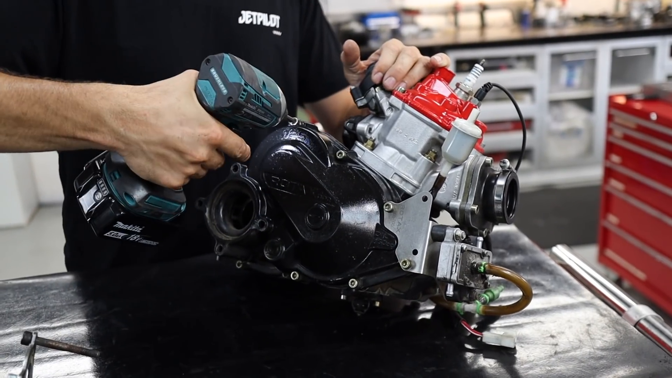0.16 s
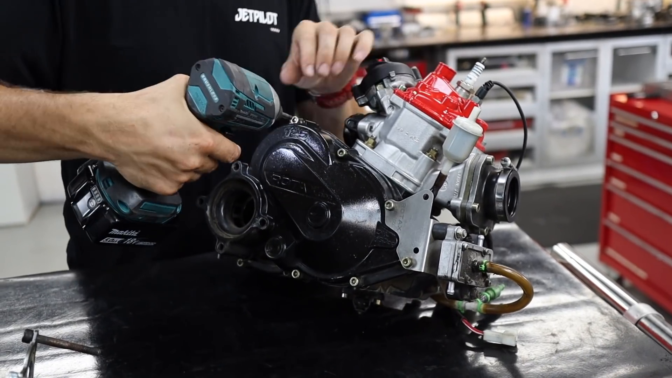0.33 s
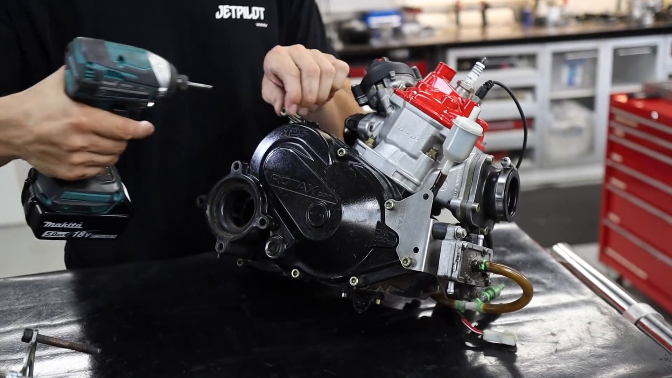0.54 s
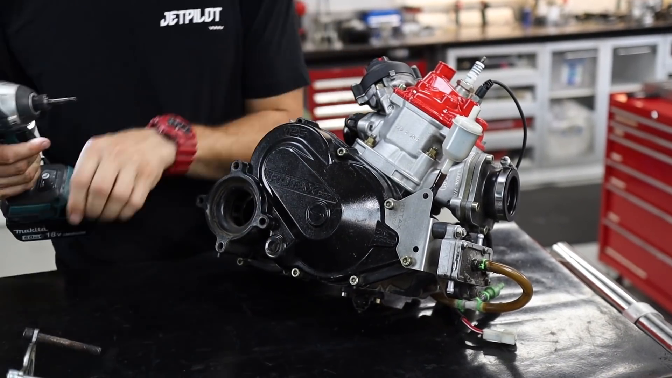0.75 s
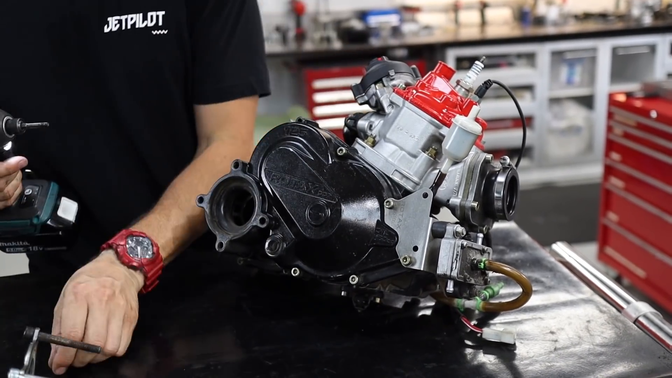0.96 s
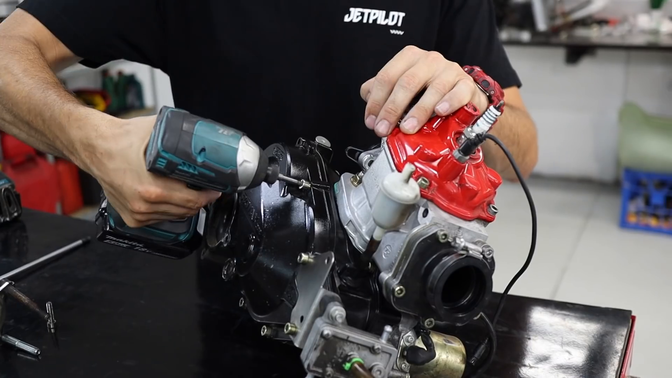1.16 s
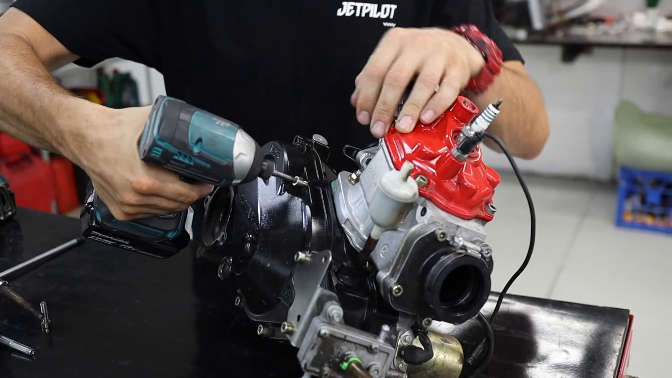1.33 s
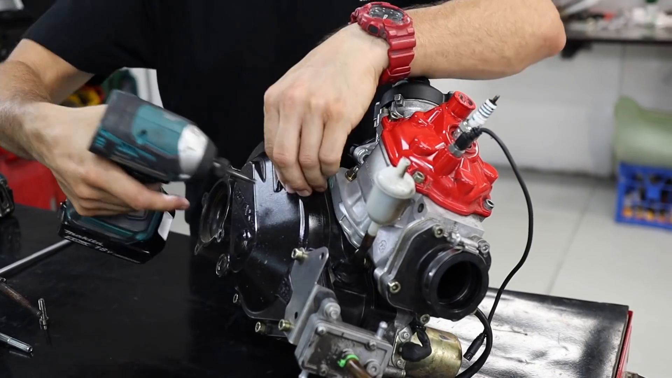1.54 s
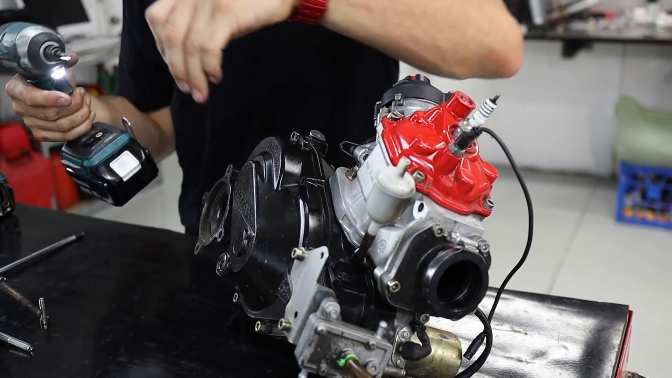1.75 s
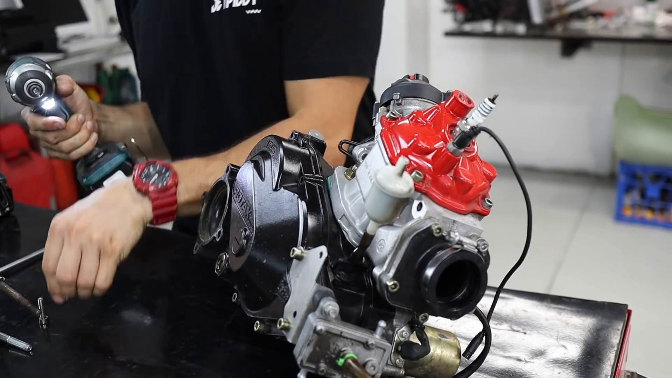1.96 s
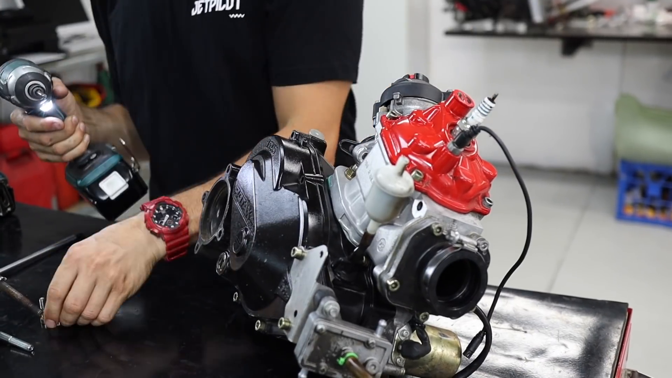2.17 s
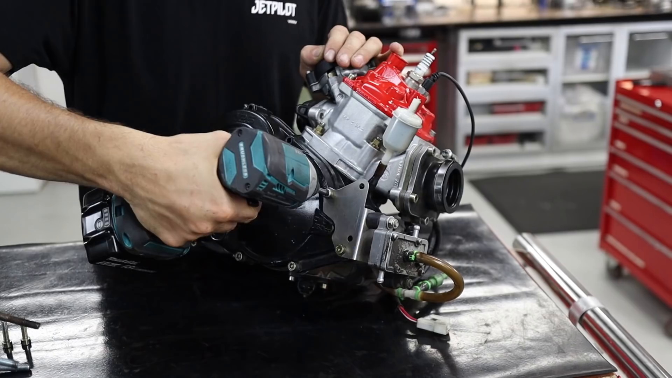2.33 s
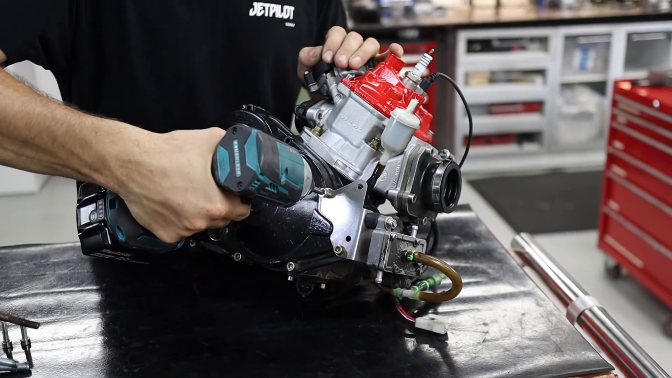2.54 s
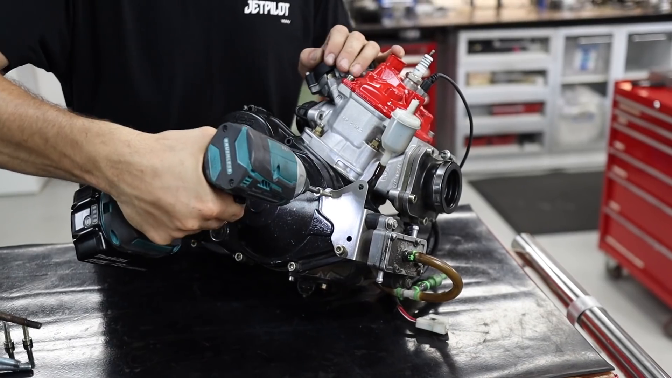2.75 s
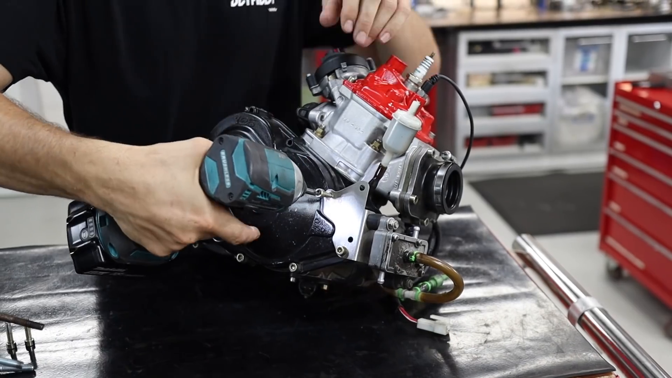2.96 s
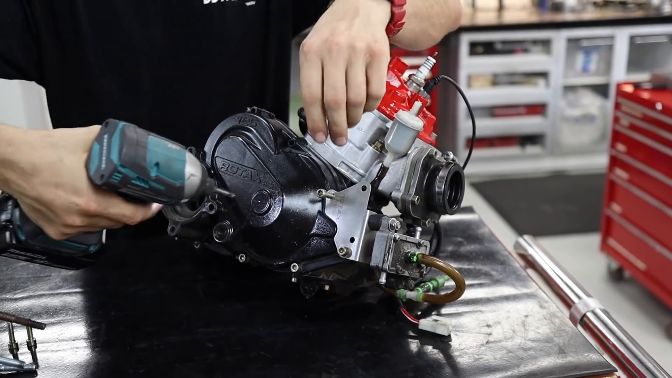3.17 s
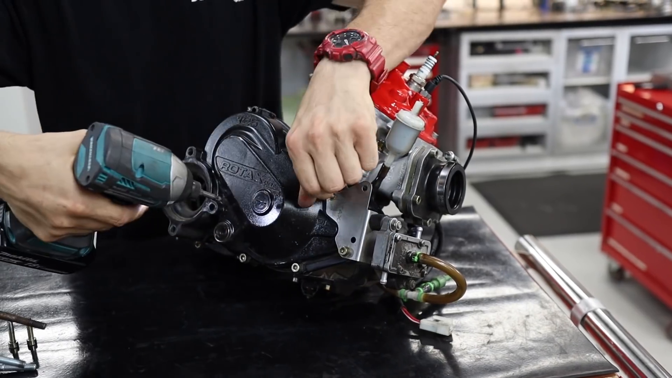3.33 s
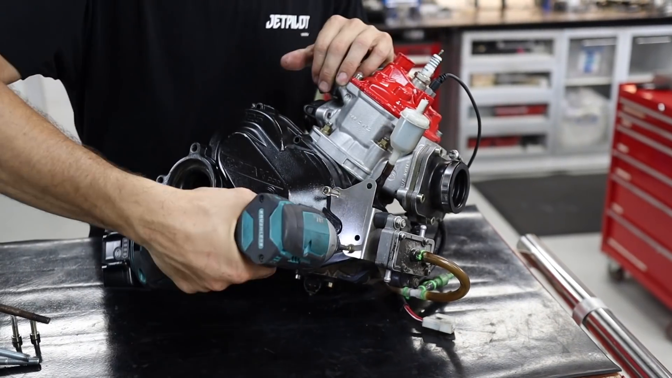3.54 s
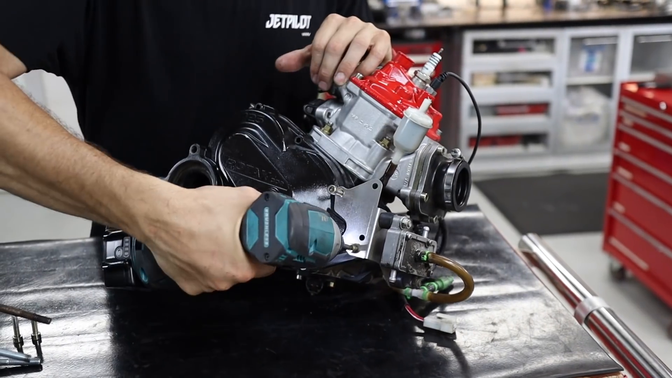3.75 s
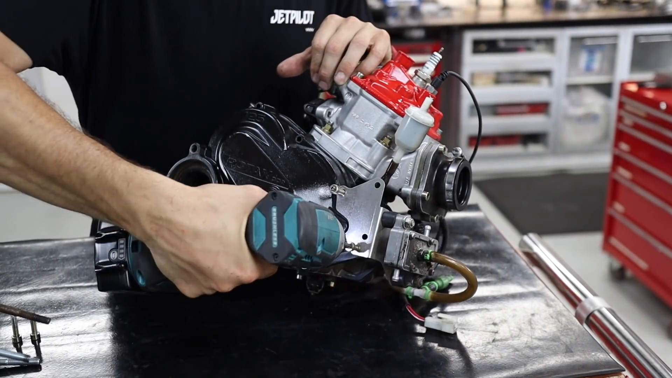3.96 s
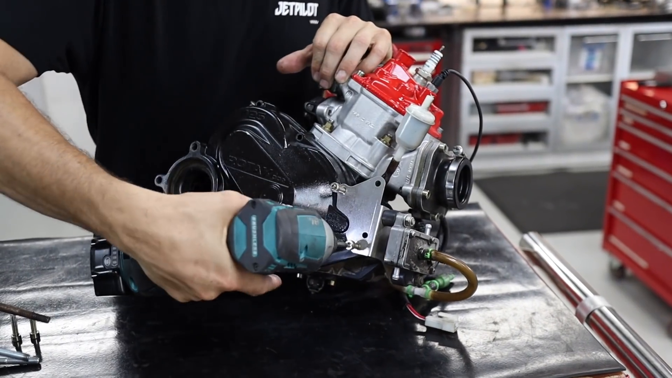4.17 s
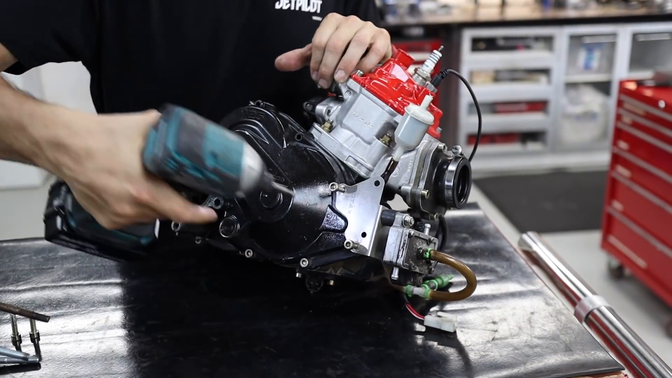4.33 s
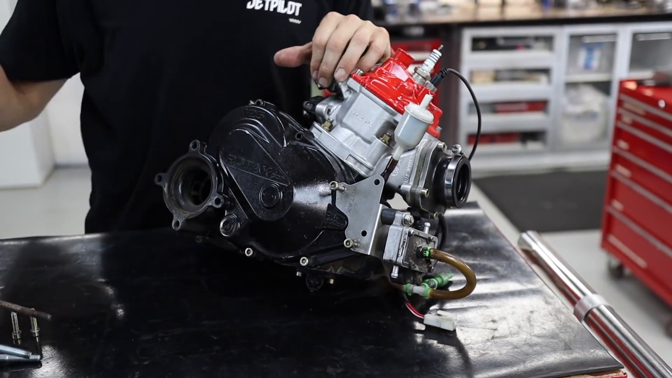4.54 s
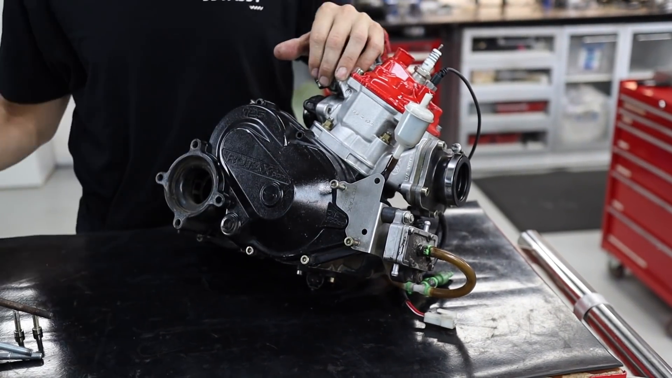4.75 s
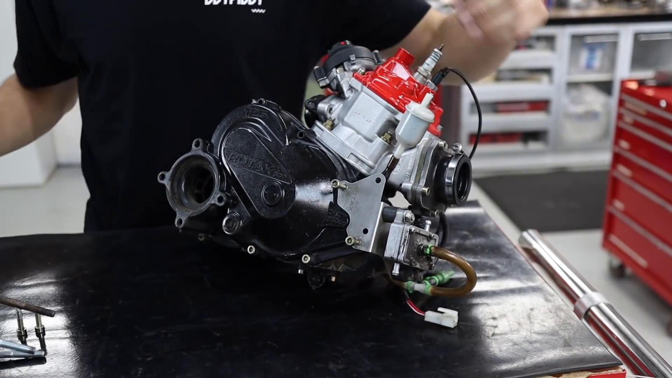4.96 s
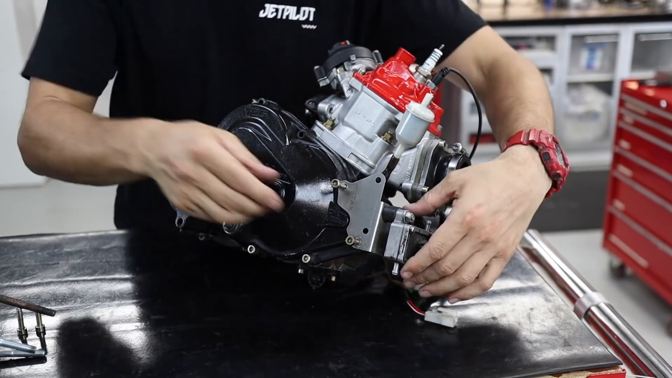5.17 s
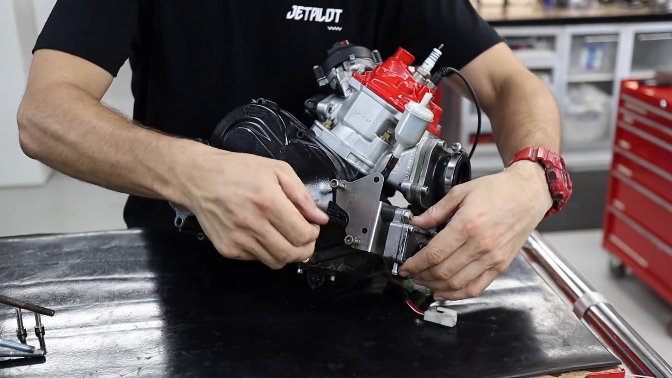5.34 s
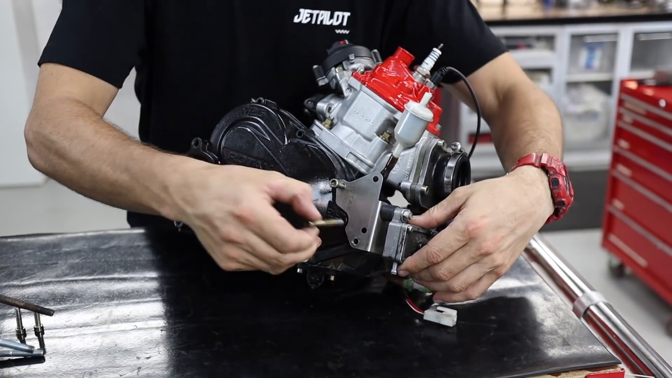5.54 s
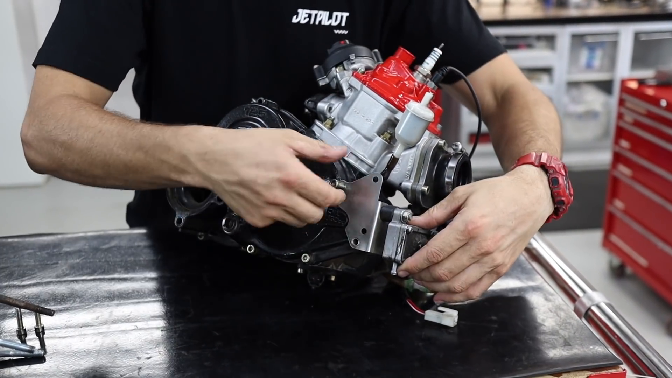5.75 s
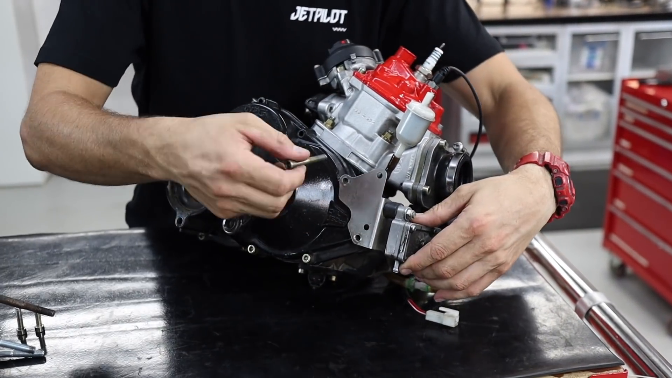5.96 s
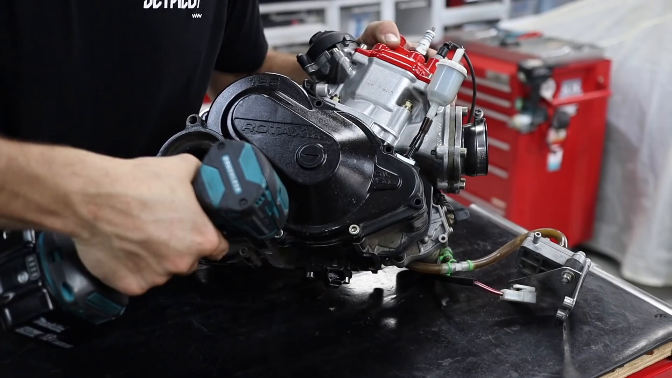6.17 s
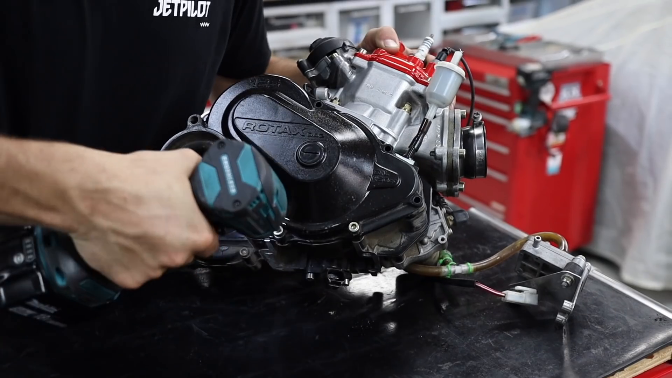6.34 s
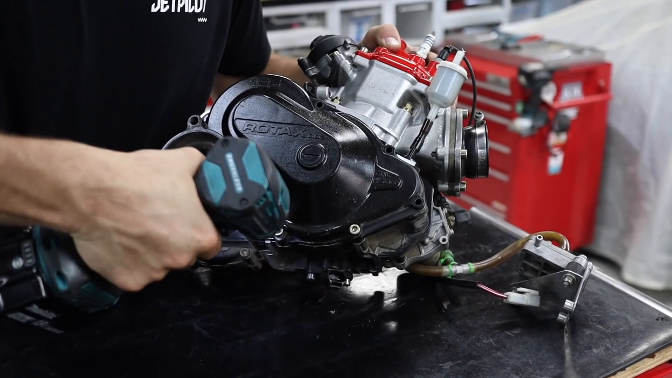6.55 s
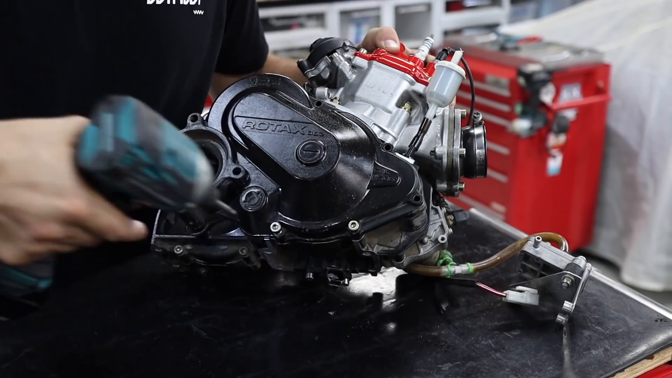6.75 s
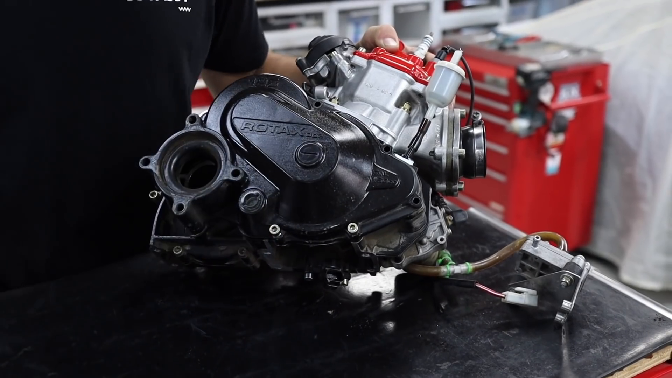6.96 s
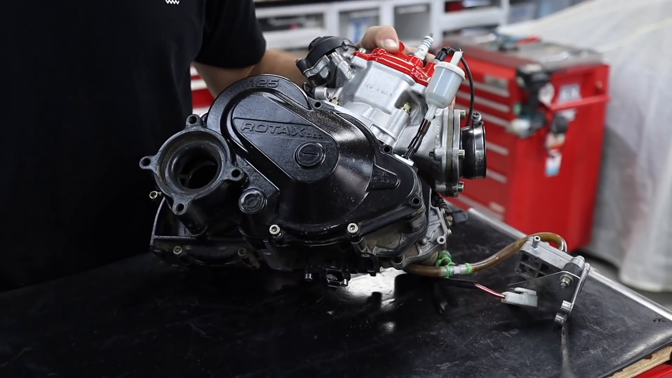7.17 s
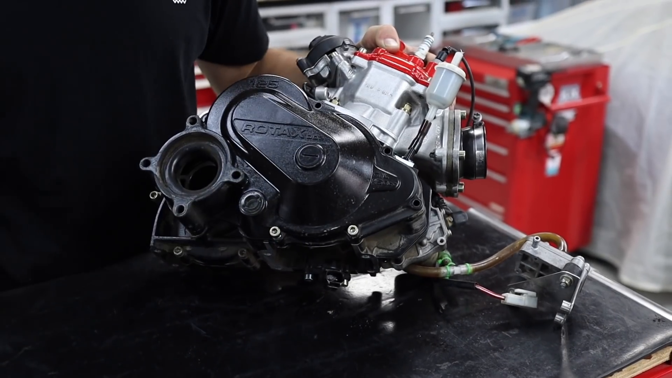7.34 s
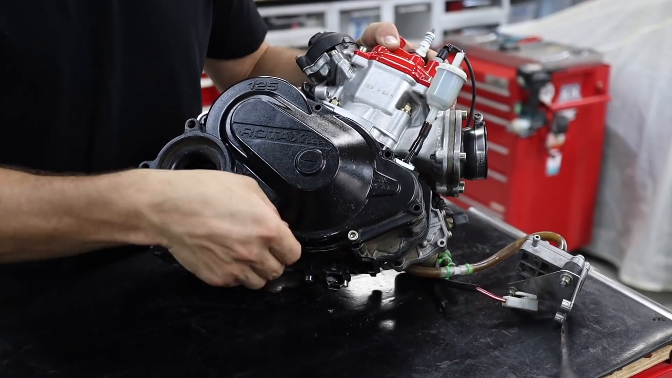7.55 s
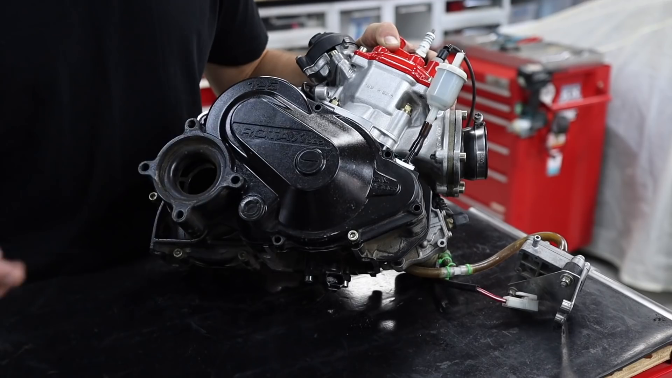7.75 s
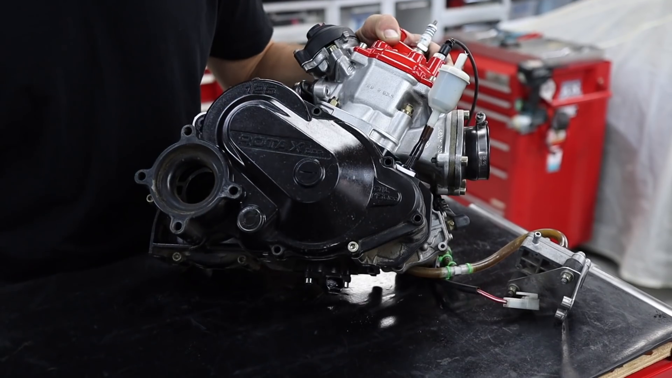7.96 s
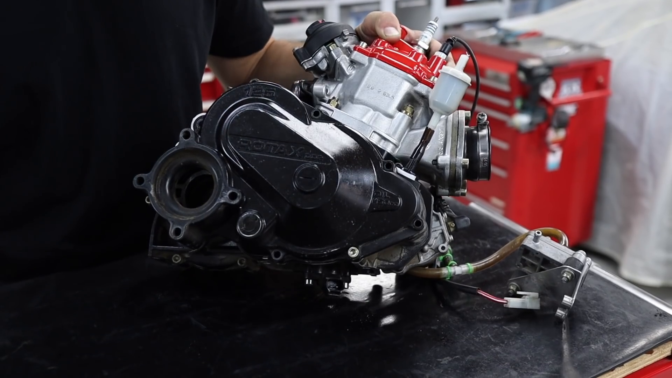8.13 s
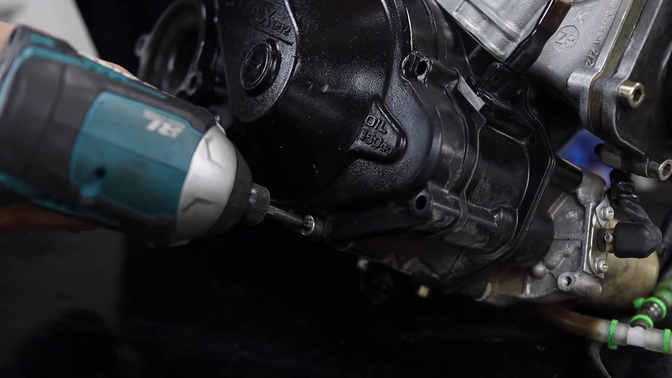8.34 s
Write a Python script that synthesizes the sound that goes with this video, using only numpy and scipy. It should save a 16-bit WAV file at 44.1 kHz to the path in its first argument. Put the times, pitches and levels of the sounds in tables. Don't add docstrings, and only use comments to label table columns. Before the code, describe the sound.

A cordless impact driver backs out screws in four short whining, rattling bursts opened by sharp hammer knocks, with ticks, bench thuds and a ringing thin plate between.

```python
import sys
import numpy as np
from scipy import signal
from scipy.fft import rfft, irfft
from scipy.io import wavfile

SR = 44100
rng = np.random.default_rng(int(sys.argv[2]) if len(sys.argv) > 2 else 0)


def volts_from_db(level):
    exponent = np.asarray(level, float) / 20
    return 10 ** exponent


def bounce(signal):
    frames = np.transpose(np.atleast_2d(signal))
    limited = np.clip(frames, -1, 1)
    pcm = np.round(limited * 32767).astype(np.int16)
    wavfile.write(sys.argv[1], SR, pcm)


N = 374850

BLUR_HZ = (150, 45, 170)
STEADY = (0, 1.7, .2)
# (frequency [Hz], level [dB], T60 [s])
DULL = [(1450, 0, .012), (2100, 0, .012), (4900, -2, .008)]


def rms_one(x):
    return x / np.sqrt(np.mean(np.abs(x) ** 2) + 1e-20)


def band(x, low_hz, high_hz, order=2):
    edges = [low_hz, min(high_hz, .45 * SR)]
    return signal.sosfilt(signal.butter(order, edges, "band", fs=SR, output="sos"), x)


def on_log(points, hz):
    table_hz, values = np.transpose(points)
    return np.interp(np.log(hz), np.log(table_hz), values)


def coloured(x, spectrum):
    hz = np.maximum(np.arange(len(x) // 2 + 1) * SR / len(x), 1)
    return rms_one(irfft(rfft(x) * volts_from_db(on_log(spectrum, hz)), len(x)))


def drift(count, rate_hz):
    r = np.exp(-2 * np.pi * rate_hz / SR)
    noise = rng.standard_normal(count + 8000)
    return rms_one(signal.lfilter([1], [1, -2 * r, r * r], noise)[8000:])


def blurred(phase, blur_hz, steady=0):
    in_phase = (steady + drift(len(phase), blur_hz)) * np.cos(phase)
    quadrature = drift(len(phase), blur_hz) * np.sin(phase)
    return (in_phase + quadrature) / np.sqrt(1 + steady ** 2 / 2)


def ring(x, hz, t60):
    r, w = volts_from_db(-60 / (t60 * SR)), 2 * np.pi * hz / SR
    return signal.lfilter([0, np.sin(w)], [1, -2 * r * np.cos(w), r * r], x + 1e-18)


def glide(start, end, from_hz, to_hz, fade_s):
    t = np.arange(round(start * SR), min(round(end * SR), N)) / SR
    already_on = start == 0
    edge = np.clip(np.minimum(t - start + already_on, end - t) / fade_s, 0, 1)
    return round(start * SR), np.interp(t, [start, end], [from_hz, to_hz]), edge


def contacts(hits, modes, middle_db, ring_db, low_hz, top_hz, swell):
    shape = np.zeros((3, N))
    t = np.arange(int(.3 * SR)) / SR
    for s, db, hard_db, dies_ms in hits:
        dies = max(dies_ms, 3) / 1000
        rise = 0.000075 + swell * dies
        fall = volts_from_db(-60 * np.maximum(t - rise, 0) / dies) * np.minimum(t / rise, 1) ** 2
        part = shape[:, round((s - .6 * rise) * SR):][:, :len(t)]
        range_db = [[db - hard_db], [db + middle_db], [db + hard_db]]
        part[:] = np.hypot(part, volts_from_db(range_db) * fall[:part.shape[1]])
    sounding = np.flatnonzero(shape[0])
    used = slice(sounding[0], sounding[-1] + SR // 10)
    white = (rng.standard_normal((3, N)) * shape)[:, used]
    edges = [(low_hz, 2500), (2500, 7000), (7000, top_hz)]
    crack = sum(band(w, a, b) * np.sqrt(SR / 2 / (b - a)) for w, (a, b) in zip(white, edges))
    rings = sum(volts_from_db(db) * ring(crack, hz, t60) for hz, db, t60 in modes)
    out = np.zeros((2, N))
    out[:, used] = crack, volts_from_db(ring_db) * rings
    return out


def gear_rattle(impacts, shift, shade):
    # (frequency [Hz], density [dB per Hz])
    gear_colour = [(59, -21), (100, 3.5), (185, -9), (320, -51), (590, -9.5), (1700, 3.5), (2760, 0.5),
                   (3340, 8.5), (3790, 3), (5100, 8.5), (6170, 1), (10500, -13), (13800, -15),
                   (15600, -20.5)]
    # (frequency [Hz], width [Hz], level [dB])
    housing = [(680, 110, -6.5), (1150, 200, -13), (4600, 310, -5.5), (5940, 920, 2), (6800, 500, -10),
               (8040, 670, -7), (9200, 350, -13.5)]
    shade_hz = [450, 900, 2400, 3800, 5000, 6300, 7800, 9500, 13000]
    rattle = coloured(impacts, [(hz * shift, db) for hz, db in gear_colour])
    body = sum(volts_from_db(db) * rms_one(ring(impacts, hz, 1.1 / width)) for hz, width, db in housing)
    return coloured(rattle + volts_from_db(-19.5) * body, list(zip(shade_hz, shade)))


def rotor_whistle(t, whistle_db, clear_at, whistle_hz):
    from_clear = t - clear_at
    level_db = whistle_db - np.minimum(3 * (from_clear / .035) ** 2, 30) + 2 * drift(len(t), 8)
    hz = whistle_hz + 5500 * from_clear
    return volts_from_db(level_db) * blurred(2 * np.pi * np.cumsum(hz) / SR, BLUR_HZ[1], STEADY[1])


def motor():
    # (start [s], brake done [s], level [dB], rise [s], gear mesh at start [Hz])
    bursts = [
        (-.3, 0.054, -14, 0.038, 1560),
        (1.216, 1.462, -14.5, 0.039, 1606),
        (2.534, 2.942, -15.5, 0.041, 1601),
        (3.777, 4.151, -14.5, 0.023, 1577),
        (6.395, 6.686, -14.5, 0.058, 1561),
    ]
    # (first, second, third mesh tone [dB], gain as the load falls away [dB])
    facing = [(-28, -16, -15.5, 6), (-17.5, -21, -41, 4), (-28, -13, -5, 2), (-31.5, -19, -17.5, 20),
              (-15, -20, -11, 9)]
    # (level [dB], clearest at [s], frequency then [Hz])
    whistles = [(-30, 0, 12700), (-18, 1.31, 12450), (-23, 2.72, 12550), (-23, 3.88, 11900),
                (-17, 6.6, 12330)]
    # (low rattle [dB], hiss [dB], mesh climb [Hz], pitch shift of the rattle spectrum [ratio])
    load = [(0, -1, 251.6, .98), (0, 0.36, 231, .99), (0, 0.011, 227.7, 1.054), (0, 1.5, 258.9, 1.03),
            (0, 0.28, 221.9, 1.05)]
    fifths = [-32, -21.5, -15.5, -24.5, -19]
    shades = [
        [2.5, 0, -2, -1.5, -1, -1.5, 2, 0, 0],
        [1.5, 0, 2, -4, 0, -2.5, 1, -1.5, 0.17],
        [-1.5, 0, 0.36, 2, 0.054, 2.5, 3, -0.5, 0.053],
        [-3.5, 0.93, 0, -1, 1, 0, 1, 0, 1],
        [0, 0, 0, -3.5, 0, -2.5, 3, -6, -1],
    ]
    carrier = [(2, 0.044), (3, 0.026), (6, 0.026)]
    out = np.zeros((2, N))
    for burst, face, whistle, (low_db, hiss_db, climb_hz, shift), fifth_db, shade in zip(
            bursts, facing, whistles, load, fifths, shades):
        start, stop, level_db, rise, start_hz = burst
        *tones_db, growth_db = face
        at = max(round(start * SR), 0)
        t = np.arange(at, round(stop * SR)) / SR
        n = len(t)
        edge = np.clip(np.minimum(t - start, stop - t) / 0.003, 0, 1)
        freed = 1 - np.exp((start - t) / .4)
        braking = np.clip(1 - (stop - t) / 0.0216, 0, 1)
        swing_db = -16.5 * np.clip(1 - (t - start) / rise, 0, 1) - 6 * braking
        mesh_hz = start_hz + climb_hz * freed - 120 * braking
        phase = 2 * np.pi * np.cumsum(mesh_hz) / SR

        impacts = volts_from_db(2.2 * np.minimum(rng.exponential(1, n), 4)) * rng.standard_normal(n)
        rattle = gear_rattle(impacts, shift, shade)
        lumps_db = 1.2 * drift(n, 60)
        low = volts_from_db(-11.5 + low_db + lumps_db + 0.37 * swing_db) * rms_one(band(rattle, 84.0, 2730))
        hiss = volts_from_db(-14 + hiss_db + swing_db) * rms_one(band(rattle, 9500, 17000, order=3))
        gears = volts_from_db(-2.5) * rms_one(band(rattle, 2500, 9500, order=3))
        gears += volts_from_db(fifth_db) * rms_one(band(impacts, 20, 348)) * np.cos(5 * phase)

        seating_db = -7 * np.exp((start + rise - t) / .07).clip(0, 1)
        unmesh_db = -14 * np.clip(1 - (stop - t) / .035, 0, 1)
        lines = sum(volts_from_db(tones_db[k]) * blurred((k + 1) * phase, BLUR_HZ[k], STEADY[k])
                    for k in range(3))
        mesh = volts_from_db(growth_db * freed + seating_db + unmesh_db) * lines
        carrier_phase = phase / 98.0
        throb = 1 + sum(d * np.cos(k * carrier_phase + rng.uniform(0, 18.0)) for k, d in carrier)
        out[0, at:at + n] += edge * volts_from_db(level_db) * throb * (volts_from_db(swing_db) * gears + low + hiss)
        tonal = throb * mesh + rotor_whistle(t, *whistle)
        out[1, at:at + n] += edge * volts_from_db(level_db + swing_db) * tonal
    return out


def background():
    # (frequency [Hz], density [dB per Hz])
    air_colour = [(13, -31.5), (22, -15), (70, -6.5), (168, 1), (209, -5.5), (373, -8.5), (439, -11),
                  (518, -10), (628, -13), (804, -11), (2480, -25), (3010, -28), (5500, -36.5), (15600, -41)]
    # (start [s], end [s], level over the rumble [dB])
    leaning = [(0, 0.116, 12.5), (2.552, 2.685, 8.5), (3.533, 3.9, 8), (4.908, 5.005, 8.5),
               (5.995, 6.3, 2.5)]
    # (start [s], end [s], from [Hz], to [Hz], level [dB])
    hum = [(0.059, 1.107, 65.2, 67.7, -41.5), (3.998, 4.476, 64.4, 68.8, -48), (0, 0.283, 141, 142, -44),
           (1.7, 2.428, 176.3, 168.2, -48.5), (2.75, 2.936, 190, 162, -41), (4.401, 4.9, 101, 99.8, -49),
           (6.498, 6.85, 104.4, 99.4, -46.5),
           (3.5, 3.98, 92, 78, -45), (3.5, 3.8, 160, 125, -47), (5.2, 5.6, 140, 155, -52)]
    # (start [s], end [s], frequency [Hz], width [Hz], level [dB])
    far_whine = (6.75, 8.0, 3050, 110, -69)
    air = coloured(rng.standard_normal(N), air_colour)
    upper = air - band(air, 80, 280)
    out = upper / np.std(band(air, 200, 2400)) * volts_from_db(-45 + 1.1 * drift(N, 1.3))
    t = np.arange(N) / SR
    leaning_db = sum(db * np.clip(np.minimum(t - start, end - t) / 0.0045, 0, 1)
                     for start, end, db in leaning)
    out += rms_one(air - upper) * volts_from_db(-49.5 + leaning_db + 1.1 * drift(N, 1.5))
    for start, end, from_hz, to_hz, db in hum:
        at, hz, edge = glide(start, end, from_hz, to_hz, 0.066)
        level = np.sqrt(2) * edge * volts_from_db(db + 2.0 * drift(len(hz), 16))
        out[at:at + len(hz)] += level * np.sin(2 * np.pi * np.cumsum(hz) / SR)
    start, end, whine_hz, width, db = far_whine
    at, hz, edge = glide(start, end, whine_hz, whine_hz, 0.052)
    out[at:at + len(hz)] += edge * volts_from_db(db) * blurred(2 * np.pi * np.cumsum(hz) / SR, width)
    return out


def handling():
    # (time [s], level [dB], hardness as treble lift [dB], decay [ms])
    ticks = [(.5794, -37.5, 1.5, 16), (.5959, -49, 10, 10), (.618, -41.5, 5.5, 9), (.6194, -43.5, 13, 26),
             (2.4343, -47.5, 2, 32), (3.1338, -50, -1, 14), (3.136, -55, -14, 170), (3.1447, -58, -11, 20),
             (3.5453, -52, -2, 20), (3.6717, -45.5, -4.5, 12), (3.6899, -54, 4.5, 40),
             (3.6993, -48, -7.5, 47), (4.598, -48, 0, 10), (4.9489, -37.5, -3, 5.1),
             (6.3263, -50.5, 1, 170), (7.1258, -52, 9, 8.8), (7.5077, -45.5, 2, 14),
             (7.5764, -24.5, 3.5, 6.2),
             (.305, -63.5, 3, 240), (.599, -45.5, 11, 106), (1.115, -50.5, -4, 190),
                   (4.66, -59, 3, 28), (4.958, -50, -7, 7.9), (4.974, -48, -5, 14), (4.99, -51, -5, 23),
                   (5.333, -68, 3, 34), (6.961, -50, -2, 12), (7.56, -58, -14.5, 170)]
    knocks = [
        (.9445, -50.5, -27, 21.9),
        (.952, -61, -19, 192.3),
        (3.535, -55.5, -10.5, 150),
        (8.1222, -36, -12, 22.8),
    ]
    bit_wobble = [(1.318, -31.5, -0.5, 139), (1.36, -34.5, -5, 185)]
    tray_hits = [(1.7065, -51, 2.5, 14), (1.7109, -40.5, 15, 11)]
    tray_buzz = [(1.714, -49.5, 1, 254), (7.68, -57.5, -7, 281)]
    bit_chatter = [(4.036, -32.5, 0.42, 60), (4.096, -33, -0.78, 40)]
    screw_hits = [(7.621, -60, -3, 52), (7.6328, -28, 10.5, 4.6), (7.635, -43.5, 4, 39),
                  (7.6515, -30.5, 7, 20.5), (7.662, -20, 8.5, 3.9), (7.664, -30, 4.5, 37),
                  (7.671, -34, 3.5, 16.8), (7.674, -39, -7.5, 20.5)]
    # (frequency [Hz], level [dB], T60 [s])
    screw_tray = [(2460, 8, 0.1), (3160, 4, .06), (4300, 0, .007), (9000, 10.5, 0.012)]
    tray_floor = [(4060, -3, .02), (4270, -3, .018), (4600, -5, .006)]
    screws = [(1980, -4, 0.02), (3940, -10, 0.011), (5100, -5, 0.0046), (6460, -6, 0.003),
              (8920, -7, 0.0079)]
    wobble_modes = [(240, -3, .025), (450, -2, .015), (660, -4, .018), (1200, 1, .012)]
    casing = [(795, -0.5, 0.0092), (1487, -1.5, 0.005), (2390, -4, 0.0027)]
    out = contacts(ticks, DULL, middle_db=4.5, ring_db=-36.0,
                   low_hz=927, top_hz=12300, swell=0.023)
    out += contacts(knocks + bit_chatter, casing, middle_db=0.0, ring_db=-19.5,
                    low_hz=624, top_hz=10930, swell=0.014)
    out += contacts(bit_wobble, wobble_modes, middle_db=9.5, ring_db=-21.5,
                    low_hz=166.0, top_hz=14000, swell=0.055)
    out += contacts(tray_hits, screw_tray, middle_db=22.0, ring_db=-36.0,
                    low_hz=1460, top_hz=12870, swell=0.029)
    out += contacts(tray_buzz, tray_floor, middle_db=6.0, ring_db=-11.5,
                    low_hz=1500, top_hz=11000, swell=0.029)
    return out + contacts(screw_hits, screws, middle_db=9.5, ring_db=-12.0,
                          low_hz=1300, top_hz=14200, swell=0.01)


def bench():
    # (time [s], level [dB])
    thuds = [
        (0.947, -36),
        (3.543, -31.5),
        (4.818, -19.5),
        (4.825, -16),
        (4.847, -25),
        (7.161, -24),
        (7.18, -33),
        (7.242, -36),
        (7.278, -37),
        (8.12, -41),
    ]
    # (frequency [Hz], level [dB], T60 [s])
    bench_modes = [(74.3, -9, 0.15), (109, -2, 0.14), (150.3, 4.5, 0.055), (225, -2.5, 0.098),
                   (294, -5.5, 0.024)]
    times, levels_db = np.transpose(thuds)
    out = np.zeros(N)
    for hz, mode_db, t60 in bench_modes:
        push = np.zeros(N)
        push[[round(s * SR) for s in times]] = volts_from_db(levels_db + mode_db + rng.normal(0, 5.6, len(thuds)))
        out += ring(push, hz, t60)
    return band(out, 62, 500)


def controller_whine():
    # (time [s], level [dB])
    chirps = [(1.148, -32), (2.462, -43), (3.712, -45.5), (6.35, -54)]
    length = .018
    t = np.arange(round(length * SR)) / SR
    out = np.zeros(N)
    for s, db in chirps:
        tone = np.sin(2 * np.pi * 8000 * t) * np.sin(np.pi * t / length) ** .5
        out[round(s * SR):][:len(t)] += volts_from_db(db) * tone
    return out


def hammer():
    # (time [s], level [dB], hardness as treble lift [dB], decay [ms])
    knocks = [
        [(1.1567, -22.5, -0.5, 180), (1.1648, -12.5, -0.5, 4.3), (1.1662, -9, -2, 4.3), (1.1681, -10, 2.5, 4.4),
         (1.1725, -16, 5, 6.3), (1.18, -16, 7, 7), (1.1849, -14, 4.5, 9), (1.2, -20.5, 6.5, 20),
         (1.2062, -24.5, 3.5, 13)],
        [(2.475, -26.5, -5, 82), (2.483, -16.5, -6, 14.5), (2.488, -19.5, -4, 12), (2.4909, -8, 11.5, 9),
         (2.494, -21, 2.5, 40), (2.504, -32, -2, 97), (2.5183, -24.5, 4, 20.64), (2.5247, -20, 6, 36),
         (2.5517, -22.5, 1.5, 8)],
        [(3.727, -30, -1, 157), (3.7327, -15.5, -3.5, 11.8), (3.7365, -15, 0.5, 7.5), (3.7399, -13, -6.5, 20),
         (3.7477, -17, 8.5, 20), (3.7564, -28, 10.5, 14)],
        [(6.3588, -19, 0.5, 29), (6.363, -20, 0.5, 90), (6.3755, -15, 3.5, 20), (6.3886, -23, 2.5, 49),
         (6.398, -34, 7.5, 28)],
    ]
    # frequency [Hz], then T60 [s]
    anvil_hz = [560, 1050, 1420, 1900, 3250, 4100, 5100, 8500, 12000, 13500]
    anvil_t60 = [0.011, .012, 0.022, 0.017, 0.015, 0.0078, 0.015, 0.012, .01, 0.015]
    anvil_grip = [
        [-6.5, -14, -12.5, -2.5, 4, 3.5, -3, 3, -3, 3.5],
        [-20.5, -17.5, -3.5, 5.5, 4.9, -3, 1, 4.5, 1.5, 6],
        [-6, -11.5, 8.5, -1.5, 1.8, -5, 6.5, -3.5, -10.5, 5.5],
        [12, -40.5, -22.5, 12.5, 6.6, -2.5, 5.5, -1.5, -2.5, -0.5],
    ]
    # (time [s], peak level [dB], hardness [dB], decay [ms])
    backlash = [(2.55, -6.5, 2.5, 14.9), (2.806, -4.5, 1, 11),
                (3.791, 0.5, 0, 15), (3.817, 0, 0.00035, 12), (3.979, -8, 0, 12),
                     (3.998, -4.5, 0, 6.5), (4.039, 4, 0, 11), (4.098, -6, 0, 7.4),
                (1.232, -12, 0, 12.5), (1.244, -10.5, 0.0072, 13), (6.428, -7.5, 0, 12),
                     (6.445, -7, 0, 14)]
    out = sum(contacts(hits, zip(anvil_hz, grip, anvil_t60), middle_db=5.0, ring_db=-35.0,
                       low_hz=600, top_hz=15800, swell=0.086)
              for hits, grip in zip(knocks, anvil_grip))
    clacks = contacts(backlash, DULL, middle_db=6.5, ring_db=-33.5,
                      low_hz=498, top_hz=10070, swell=.1)
    return out + volts_from_db(-24) * clacks


def bit_seating():
    # (time [s], level [dB], hardness as treble
    # lift [dB], decay [ms])
    seats = [(1.679, -58.5, -11, 40), (3.365, -42, -10.5, 11), (3.3736, -46, -3, 13),
             (3.3992, -40, 2.5, 60), (3.4085, -35.5, -0.5, 25), (3.421, -41.5, -7.5, 37),
             (3.4348, -31.5, -5.5, 14.7), (3.4435, -30, 4, 7.7), (3.4452, -22, 0.5, 14),
             (3.458, -45, 1, 10)]
    # (frequency [Hz], level [dB], T60 [s])
    screw_head = [(1230, -15, .012), (2080, -9, .007), (3260, 5.5, 0.0071), (4800, 3.5, 0.0045),
                  (5670, 5, .007), (8780, -2.5, 0.012)]
    return contacts(seats, screw_head, middle_db=8.5, ring_db=-25,
                    low_hz=960, top_hz=12380, swell=0.055)


def bearing_squeal():
    # (time [s], length [s], frequency [Hz], level [dB])
    squeals = [(3.682, .025, 8600, -52.5), (4.05, .022, 13350, -28), (4.088, .022, 13200, -26)]
    out = np.zeros(N)
    for s, length, hz, db in squeals:
        t = np.arange(round(length * SR)) / SR
        flutter = 2 * np.pi * hz * t + 1.5 * np.sin(2 * np.pi * 130 * t)
        out[round(s * SR):][:len(t)] += volts_from_db(db) * np.sin(flutter) * np.sin(np.pi * t / length)
    return out


def set_down():
    # (time [s], level [dB], hardness as treble lift [dB], decay [ms])
    landings = [
        (4.8217, -31, -4.5, 44),
        (4.8275, -21.5, 3, 6.3),
        (4.8411, -32, 8.5, 6.3),
        (4.8527, -25, 0.5, 13.4),
        (7.1604, -23.5, 3, 11),
        (7.1749, -33, 4, 29),
        (7.182, -16, 2.5, 13.5),
        (7.2038, -42, 2, 26),
        (7.2446, -43, -5, 19),
    ]
    shudder = [(4.816, -34, -1.5, 269), (7.154, -39.5, -3, 261)]
    # (frequency [Hz], level [dB], T60 [s])
    battery = [(2305, 1, 0.024), (3600, 8, 0.005), (5500, -7, 0.011), (9500, -33, .015), (15270, 6, 0.075)]
    return contacts(landings + shudder, battery, middle_db=-1.5, ring_db=-33.0,
                    low_hz=493, top_hz=13470, swell=0.011)


def plate():
    # (time [s], level [dB], hardness as treble lift [dB], decay [ms])
    touches = [
        [(5.3445, -42, 1.5, 68), (5.9348, -40.5, 1, 15)],
        [(5.54, -52.5, 4, 30), (5.547, -36.5, 4, 61.3), (5.559, -35.5, 3, 21), (5.567, -40, 8.4, 59.2),
         (5.575, -47.5, 3.4, 20)],
        [(5.853, -66, -4.5, 30), (5.876, -42.5, -3, 26), (5.8797, -36.5, -1, 30), (5.886, -37, 0.5, 30),
         (5.8905, -20, 5.5, 23), (5.894, -23.5, 5, 25), (5.8975, -19.5, 3.5, 18), (5.906, -33, 5.5, 30),
         (5.918, -38, 5.5, 60), (5.9345, -36.5, -0.5, 25)],
    ]
    # frequency [Hz], then T60 [s]
    plate_hz = [1850, 2366, 2751, 3420, 4430, 5254, 5495, 6355, 7085, 8135, 8755, 10200, 10990, 12230,
                13435, 14200]
    plate_t60 = [0.066, 0.083, 0.0342, 0.032, 0.035, .04, 0.099, 0.055, 0.021, 0.057, .04, 0.0408, 0.055,
                 .05, .05, 0.024]
    spots = [
        [-1, 5.5, -5.5, -5, -2.5, -14, -3.5, -20.5, -22.5, -10, -12, -11, -12, -15, -11, -11],
        [0, -28.5, -20, 0, -5, -8, -13, -11, -16.5, 0.5, -7, -14, -7.5, -8, -8, -11.5],
        [-1, -3, -9.5, 0, 3, -2.5, -5.5, -14, -12.5, -3, -1, -11, 3, -16, -7, -9],
    ]
    out = np.zeros((2, N))
    for hits, spot in zip(touches, spots):
        modes = list(zip(plate_hz, spot, plate_t60))
        modes += [(hz + 40, db - 21, t60 * 4.0) for hz, db, t60 in modes]
        out += contacts(hits, modes, middle_db=7.5, ring_db=-24.0,
                        low_hz=864, top_hz=15300, swell=0.088)
    return out


def workshop(x):
    # (frequency [Hz], T60 [s])
    room = [(300, .4), (900, .3), (1800, .22), (3400, .3), (5000, .29), (9000, .27), (15000, .15)]
    t = np.arange(int(.6 * SR)) / SR
    edges = 150 * 2 ** np.arange(0, 7.1, .5)
    tail = sum(band(rng.standard_normal(len(t)), a, b) * volts_from_db(-60 * t / on_log(room, a))
               for a, b in zip(edges, edges[1:]))
    tail = tail * np.clip(t / 0.014, 0, 1)
    return signal.fftconvolve(x, tail / np.sqrt(np.sum(tail ** 2)))[:N]


def scene():
    near = motor() + handling()
    near[0] += bench()
    near[1] += controller_whine() + bearing_squeal()
    near += hammer() + bit_seating() + set_down() + plate()
    noisy, tones = near
    reverberant = volts_from_db(-15) * workshop(noisy + .3 * tones)
    mono = noisy + tones + reverberant + background()
    return np.array([mono, mono])


def band_limit(x):
    return signal.sosfilt(signal.butter(12, 15780, fs=SR, output="sos"), x)


def record(dry):
    # (frequency [Hz], width [Hz], share added [ratio])
    microphone = [(8200, 2600, .45), (10800, 2200, -.33), (15900, 2500, -.25)]
    for hz, width, share in microphone:
        dry = dry + share * signal.lfilter(*signal.iirpeak(hz, hz / width, fs=SR), dry)
    dry = signal.sosfilt(signal.cheby2(10, 40, 16300, fs=SR, output="sos"), dry)
    mix = np.clip(dry, -1, 1)
    return band_limit(mix)


dry = scene()
out = record(dry)
bounce(out)
```